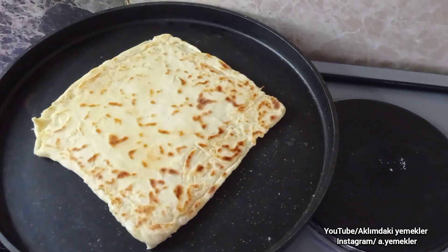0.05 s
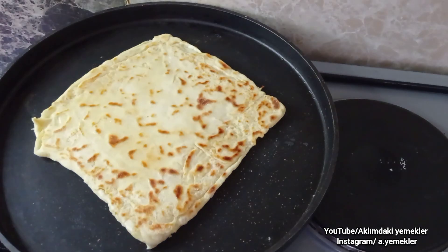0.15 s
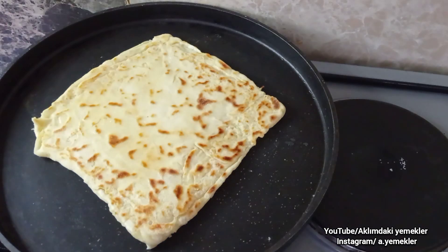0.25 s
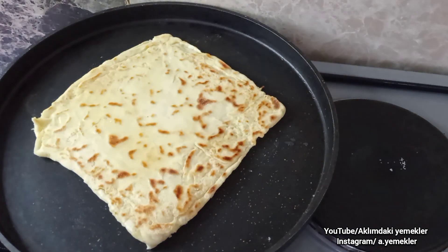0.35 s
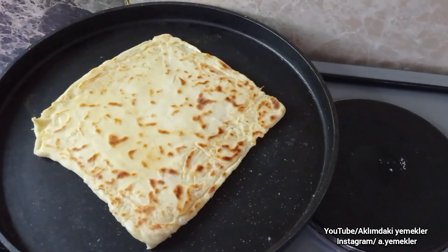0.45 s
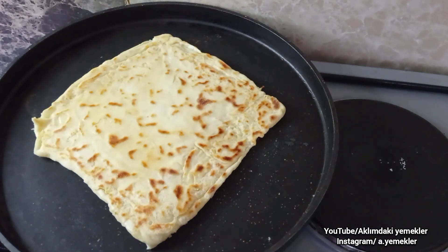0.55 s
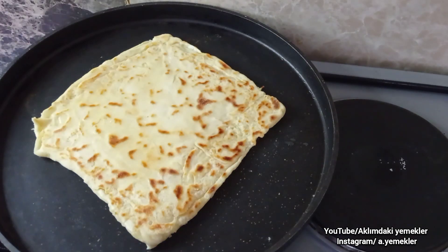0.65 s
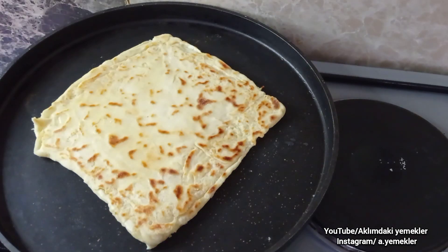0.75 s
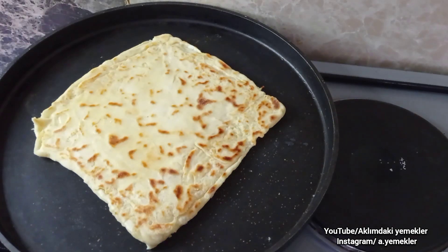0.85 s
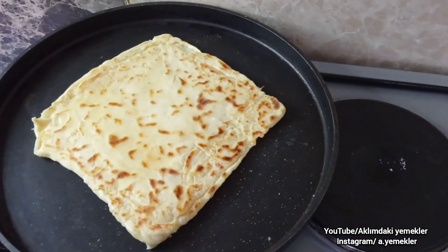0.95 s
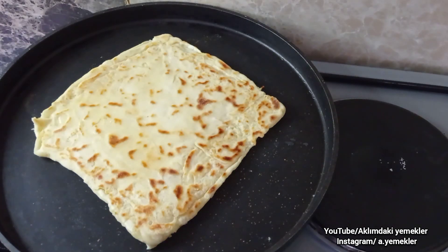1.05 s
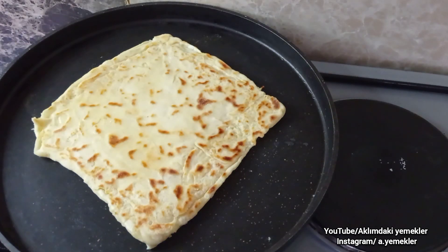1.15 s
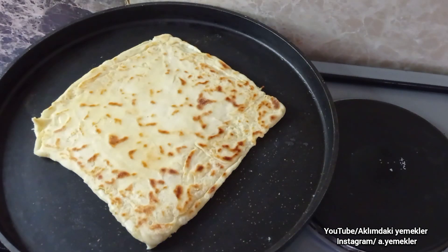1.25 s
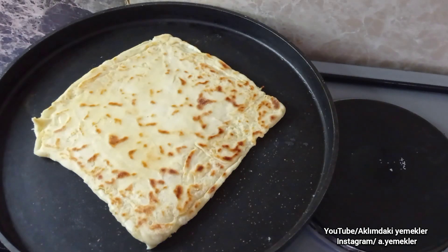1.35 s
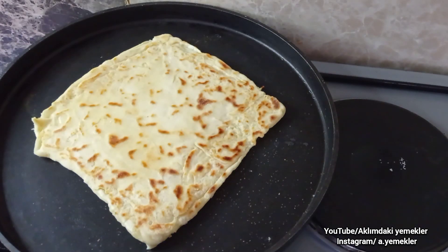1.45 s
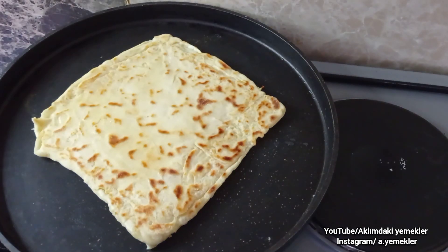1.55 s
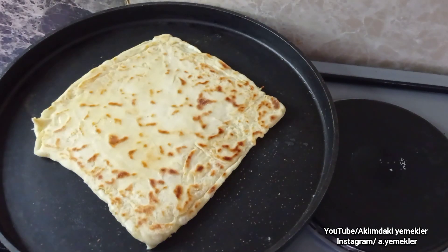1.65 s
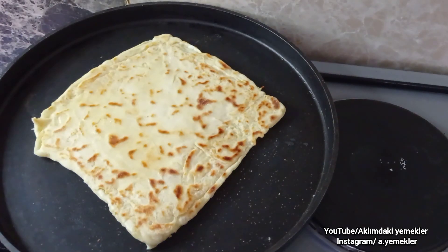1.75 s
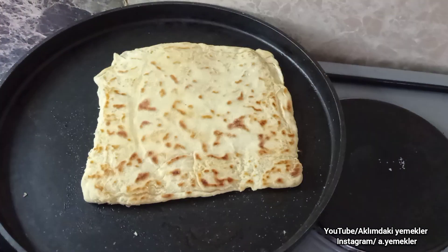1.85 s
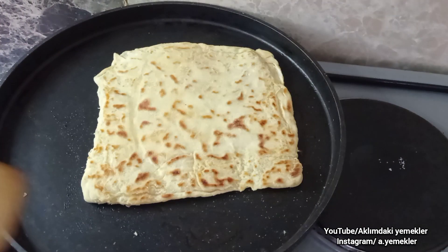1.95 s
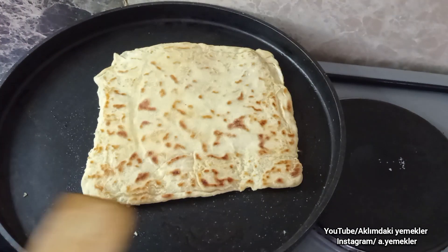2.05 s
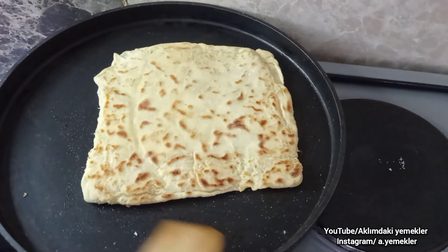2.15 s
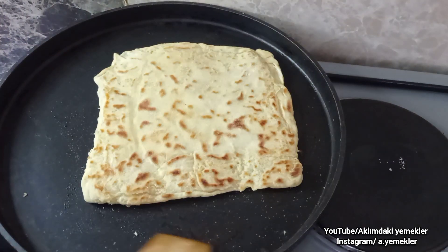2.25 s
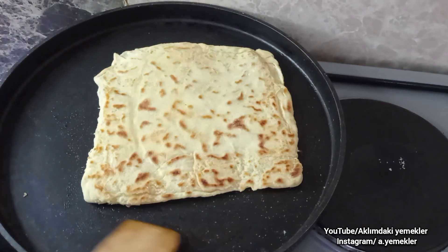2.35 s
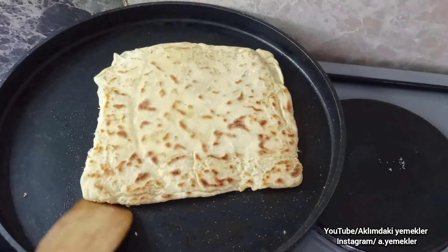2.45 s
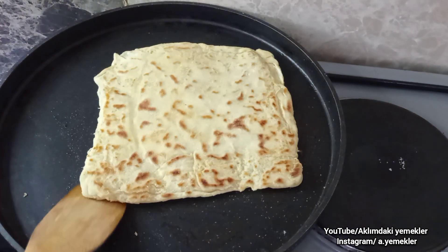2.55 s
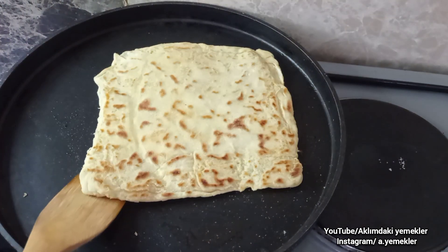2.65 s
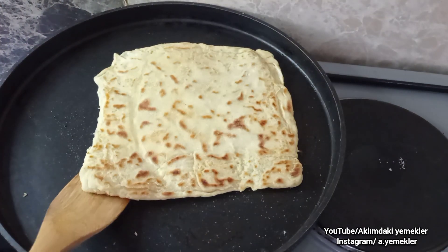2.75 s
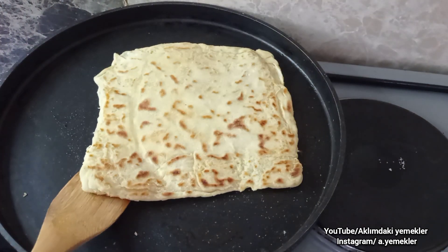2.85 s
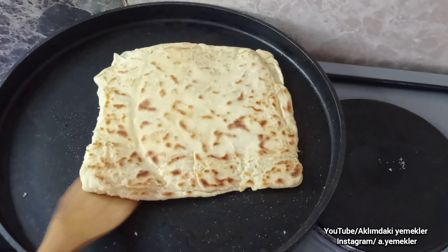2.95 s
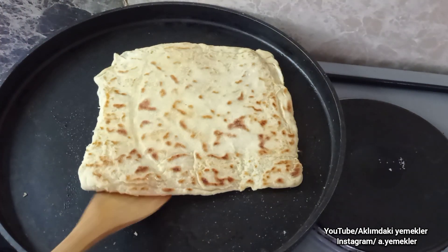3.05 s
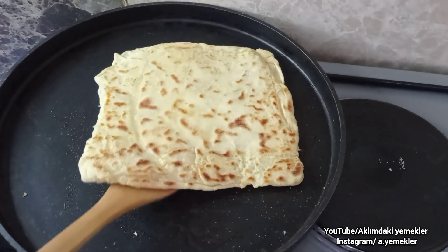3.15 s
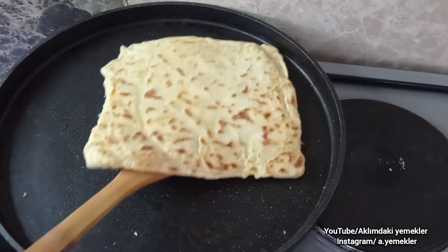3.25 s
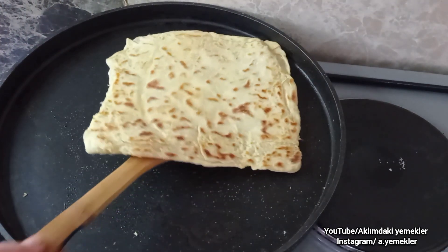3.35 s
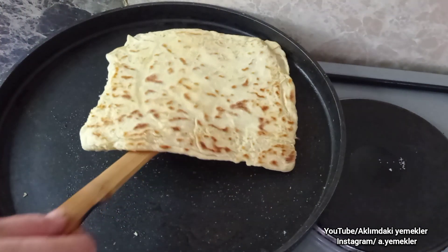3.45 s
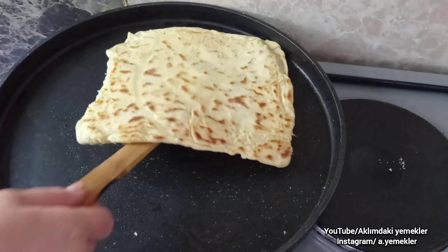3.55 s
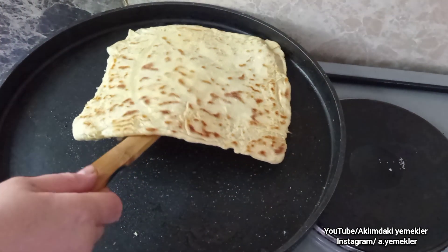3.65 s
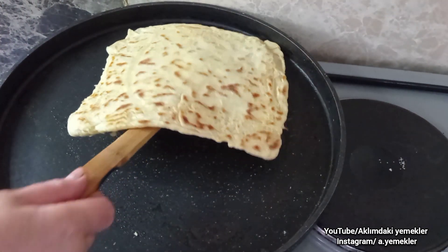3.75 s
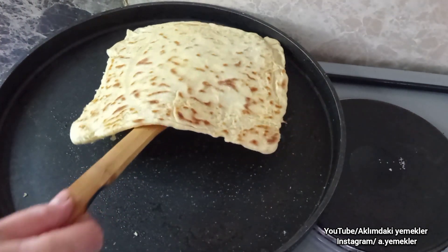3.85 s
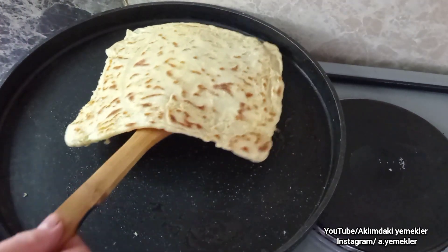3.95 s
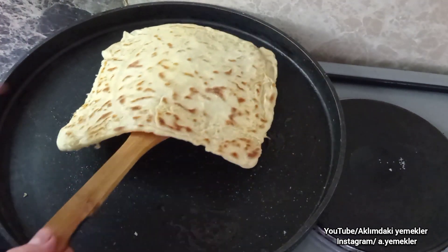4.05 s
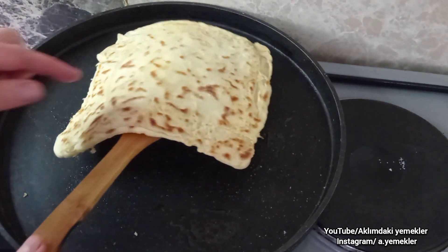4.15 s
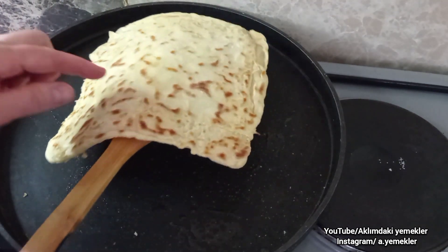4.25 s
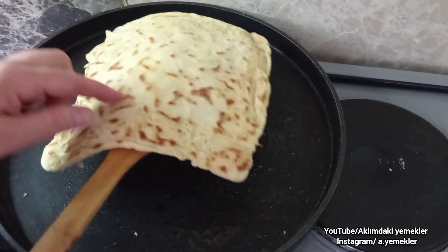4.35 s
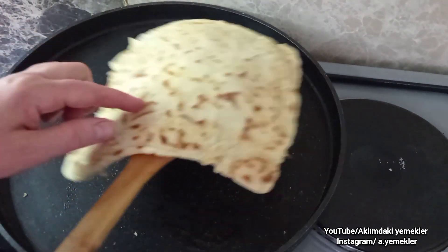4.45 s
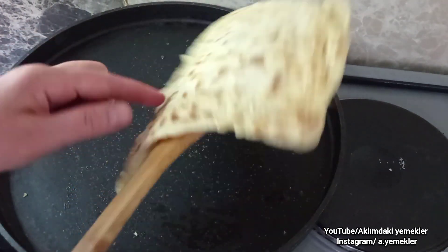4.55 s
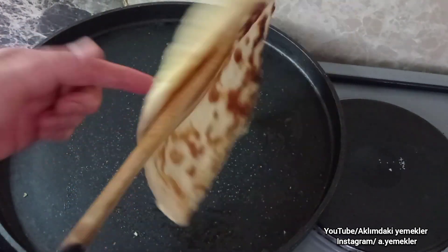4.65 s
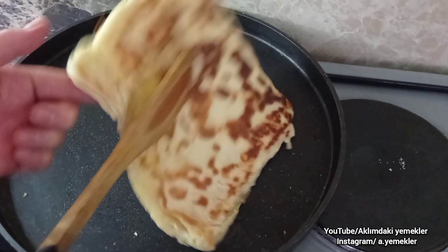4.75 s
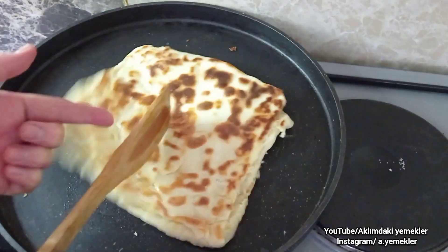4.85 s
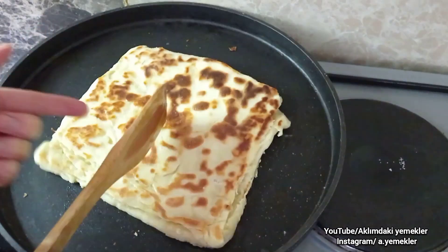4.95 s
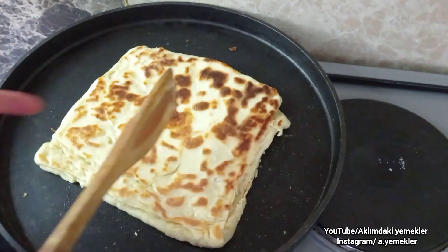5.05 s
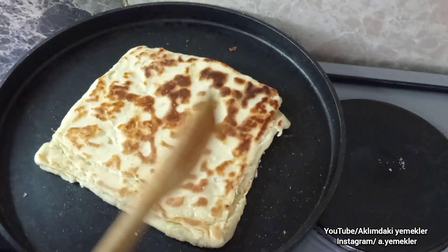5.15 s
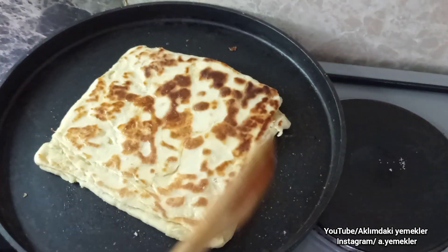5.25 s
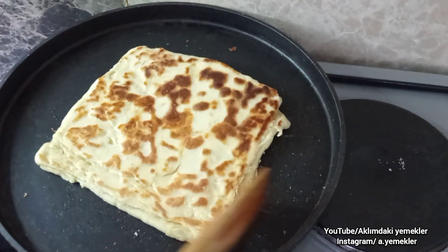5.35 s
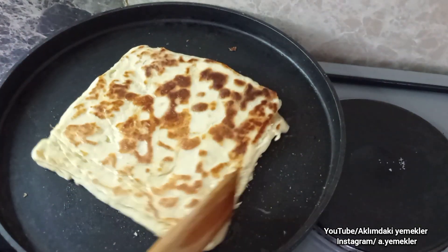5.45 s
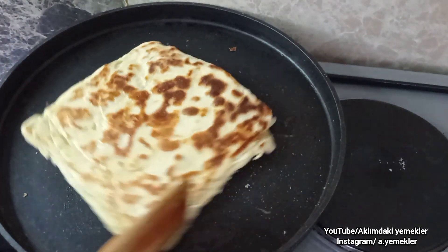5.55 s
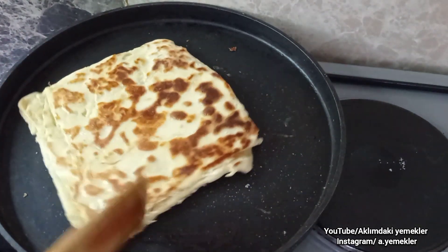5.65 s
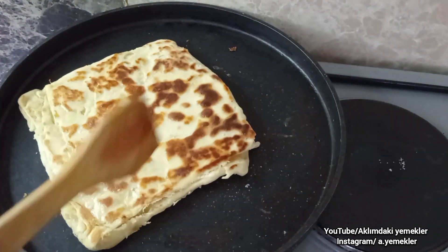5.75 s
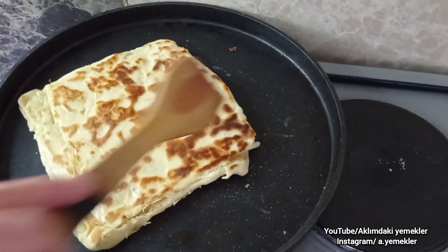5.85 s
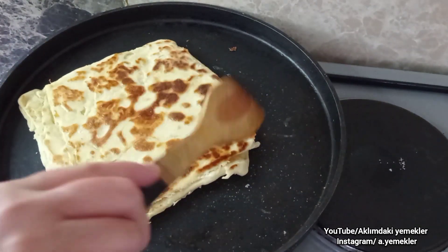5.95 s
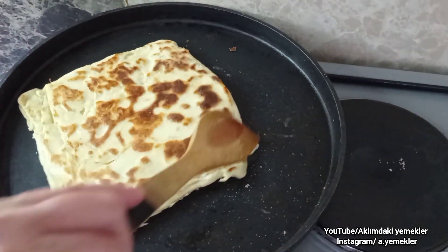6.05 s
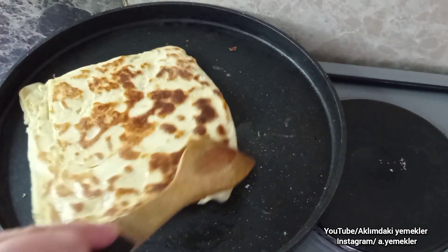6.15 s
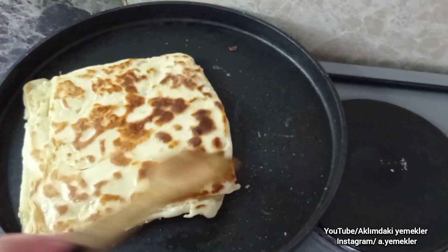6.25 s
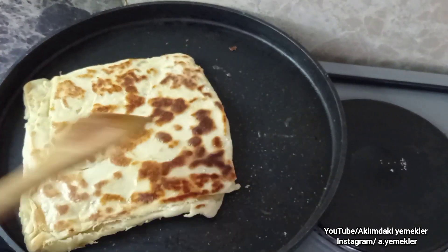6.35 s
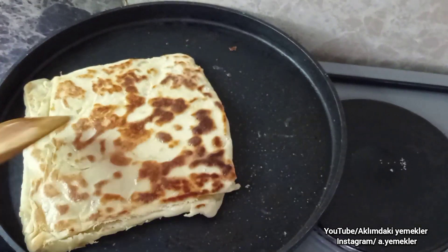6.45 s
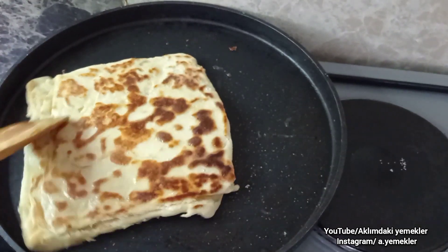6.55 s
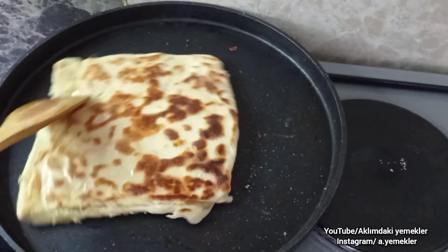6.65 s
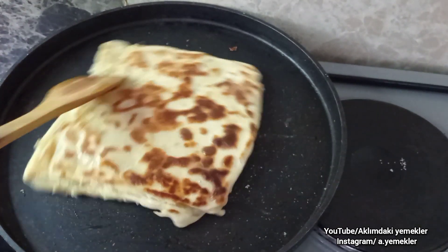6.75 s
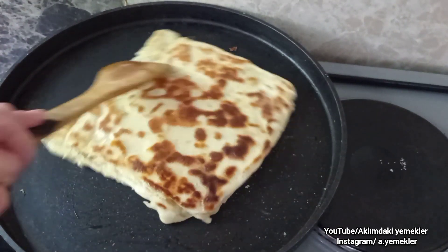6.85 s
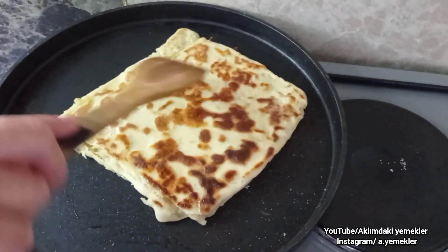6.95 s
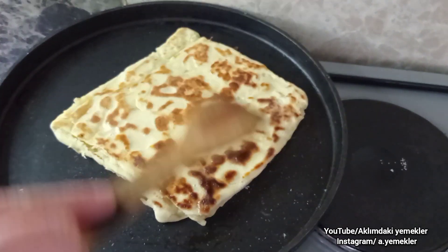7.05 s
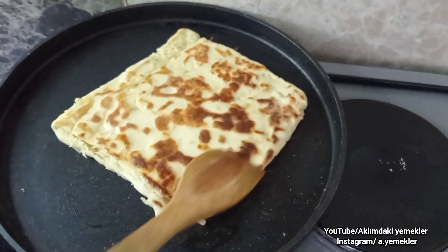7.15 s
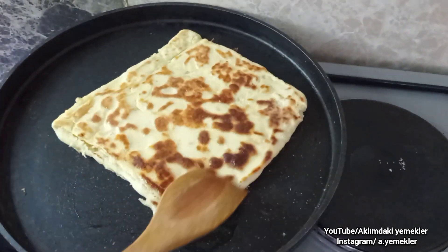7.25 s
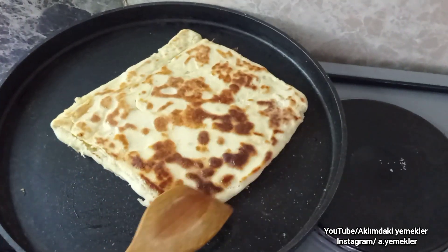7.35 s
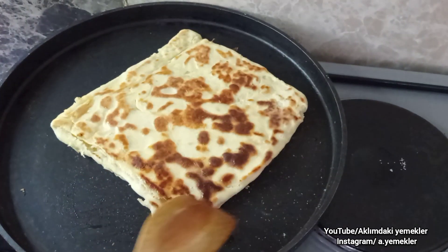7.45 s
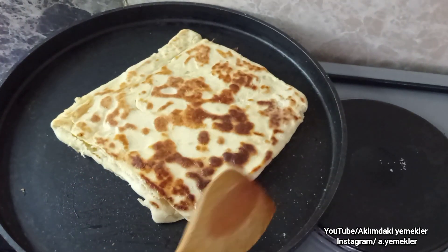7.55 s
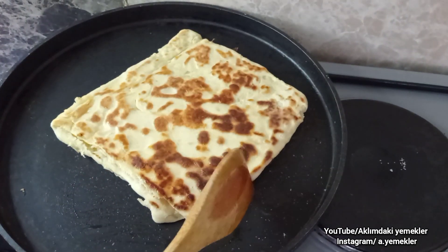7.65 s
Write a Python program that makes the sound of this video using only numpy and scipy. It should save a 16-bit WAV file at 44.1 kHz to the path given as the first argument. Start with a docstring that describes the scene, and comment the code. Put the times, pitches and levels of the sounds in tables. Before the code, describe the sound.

Heard close up in a small kitchen, a flatbread fries with a quiet hiss while an appliance hums faintly. After a momentary dropout, a wooden spatula knocks and rasps across the non-stick pan, and the oil briefly spits louder. Thin ticks lead to the flip, with soft thuds and the loudest clack. The bread then swishes over the pan among lightly ringing knocks, ending with short, squeaky scrapes.

```python
"""A wooden spatula turns a flatbread in a non-stick pan, heard close up in a small kitchen.
The blade knocks, and it scrapes, chatters and ticks by stick-slip; knocks and friction ring the pan.
The bread flops over with a snap of crust and dull thuds, and swishes as it is pushed around.
Oil bubbles burst in a steady sizzle that flares as the bread is lifted. An appliance hums faintly.
All sound drops out briefly near 1.7 s."""
import sys
import numpy as np
from scipy import signal
from scipy.fft import rfft, irfft
from scipy.io import wavfile
from scipy.ndimage import uniform_filter1d

SR = 44100
rng = np.random.default_rng(int(sys.argv[2]) if len(sys.argv) > 2 else 0)


def file_out(sig):
    """Save sig as 16-bit WAV at sys.argv[1]."""
    # one column per channel
    cols = np.atleast_2d(sig).T
    # limit, then scale
    lim = np.clip(cols, -1, 1)
    pcm = np.round(lim * 32767).astype(np.int16)
    wavfile.write(sys.argv[1], SR, pcm)


N = 340011
TIME_S = np.arange(N) / SR
FREQ_HZ = np.fft.rfftfreq(N, 1 / SR) + 1e-3

# Knocks and clicks in the pan: spatula blows and one snap of crust (4.707 s).
# t/s, level/dB, f_low/Hz, f_high/Hz, contact t60/s, ring re crack/dB
PAN_KNOCKS = [(2.087, -61, 3050, 7000, 0.056, -9), (2.287, -49, 350, 6000, 0.32, 3),
              (2.296, -50.5, 350, 1000, 0.031, -1), (4.707, -45, 4800, 9000, 0.014, -5),
              (4.811, -43.5, 200, 4000, 0.11, -24), (4.829, -38.5, 251, 1930, 0.29, -31),
              (4.844, -35.5, 2000, 9050, .06, -27), (4.885, -45, 500, 4000, 0.17, -20),
              (4.8993, -23, 3800, 7300, .06, -7), (4.901, -23.5, 880, 2330, 0.028, -2),
              (5.3586, -28.5, 402, 2620, 0.13, 4.5), (6.005, -41, 1490, 8700, 0.011, -5.5),
              (6.016, -32.5, 334, 2400, .038, -5), (6.535, -45.5, 250, 6600, 0.42, 0.5),
              (6.584, -39, 200, 3000, 0.13, -9), (7.130, -42, 700, 7540, 0.05, -19),
              (7.133, -33, 334, 1270, 0.024, -13.5), (7.154, -52, 402, 1500, 0.025, -16),
              (7.299, -47, 590, 8100, 0.057, -13), (7.681, -47.5, 680, 6740, .04, -3.5)]
# Blade slides: t/s, length/s, level/dB, drift/dB, body re rub/dB
BLADE_STROKES = [(2.292, 0.5, -64.5, -1.5, -7), (2.964, .12, -46, -0.5, -9), (3.11, .22, -53, 4, -6),
                 (3.347, .29, -51.5, -1.5, -8), (3.7, 0.22, -61.5, 3.5, -7), (3.946, 0.46, -65, -10.5, -7),
                 (7.13, 0.11, -51, -3, -3), (7.271, .11, -59.5, 1, -4)]
# Pressed edge: t/s, length/s, rasp level/dB, drift/dB, squeak re rasp/dB, squeak f/Hz
EDGE_CHATTER = [(2.37, .098, -56.5, 11.5, -1.5, 2193), (2.483, 0.42, -58, -3.5, -27, 2270),
                (7.144, 0.081, -54.5, 9.5, -2.5, 6300), (7.255, 0.048, -56.5, 12, -6, 6400),
                (7.328, 0.048, -54.5, 4, -10, 6340)]
# Lone edge slips: t/s, relative level/dB
EDGE_SLIPS = [(4.152, -43), (4.249, -43), (4.464, -47), (4.692, -42), (5.292, -52), (6.385, -45.5)]
# Pan modes: f/Hz, relative level/dB, t60/s
PAN_MODES = [(170, -17, 0.34), (385, -6.5, 0.25), (630, -10.5, 0.23), (892, -15.5, 0.09),
             (1079, -6.5, 0.15), (1240, -5, 0.1), (1400, -3.5, 0.097), (1490, 1.5, 0.16),
             (1580, -6.5, 0.21), (1837, -11.5, 0.24), (1980, -8.5, 0.23), (2139, -3, 0.23),
             (2170, -11, 0.39), (2740, -3.5, 0.11), (2850, -16, 0.11), (3160, -19, 0.15), (3410, -2, 0.15),
             (4130, 0.5, 0.082), (4258, -23, 0.13), (5230, -5, 0.24), (5250, -1, 0.13), (5800, -14, .16),
             (6000, -2, 0.077), (6120, 6.5, 0.076), (6620, 5, .1)]
# Bread pushed over the pan: t/s, length/s, relative level/dB
BREAD_PUSHES = [(5.445, 0.26, -40), (6.02, 0.25, -44), (6.528, .44, -42)]
# Bread lands or is pressed: t/s, relative level/dB, f/Hz, t60/s
BREAD_THUDS = [(2.8, -60.5, 264, 0.27), (4.817, -40.5, 204, 0.28), (4.902, -43, 142.4, 0.65),
               (4.903, -44, 380, 0.3), (4.986, -49.5, 241, 0.24), (5.362, -39.5, 420, 0.2),
               (6.018, -39.5, 460, 0.15), (6.586, -44.5, 128, 0.17), (7.134, -52, 110, 0.21),
               (7.134, -56, 374, 0.22)]
# Large oil bubbles: t/s, relative level/dB
OIL_POPS = [(1.6236, -53), (3.2442, -41), (3.313, -35), (3.3296, -31), (3.7952, -38), (3.822, -39.5),
            (3.9367, -40), (4.5103, -48), (4.663, -47), (5.526, -34.5)]
# Oil envelopes, steady and flaring: t/s, relative level/dB
FRYING_ENVELOPE = [(0, -63.5), (1.66, -64.5), (1.9, -70), (2.3, -63), (5.5, -62), (6.6, -66), (7.7, -68)]
FLARE_ENVELOPE = [(2.9, -71), (3.05, -59), (3.22, -63.5), (3.34, -53.5), (3.5, -56), (3.6, -48),
                  (3.69, -47.5), (3.8, -58.5), (4.1, -66), (4.62, -77)]
# Appliance air resonances and mains lines: f/Hz, width/Hz, level/dB
HUM_LINES = [(1338, 5.3, -80.5), (1403, 39, -75.5), (128.4, 22, -81.5), (58.8, 3.2, -89)]
# Brief chance rises in the level of the fluttering hum: t/s, length/s, level/dB
HUM_RISES = [(0, 0.02, -68), (0.118, 0.046, -68), (0.817, 0.048, -64.5), (0.948, 0.021, -68),
             (1.203, 0.045, -65)]
# Source spectra: f/Hz, gain/dB
BLADE_SPECTRUM = [(40, -19), (130, -9), (280, -12), (400, -1.5), (580, 0), (750, -7.5), (1020, 1.5),
                  (1500, -5.5), (2200, -7.5), (3500, -12), (6500, -9), (9000, -28), (16000, -48)]
RASP_SPECTRUM = [(800, -19), (2400, -3), (3500, -3), (5000, -3.5), (6300, 2.5), (7400, -3), (9000, -8.5),
                 (13000, -22.5), (16000, -32)]
CRUST_SPECTRUM = [(40, -35.5), (130, -5.5), (260, -18), (400, -5), (620, 4), (800, 1), (1500, 3), (2700, 2),
                  (4500, -2.5), (6500, -3.5), (7500, -5), (8300, -13.5), (12500, -23), (16000, -38)]
FRYING_SPECTRUM = [(300, -29), (1000, -7.5), (3000, -11.5), (4200, -2.5), (5300, 1.5), (6400, 3.5),
                   (7300, -0.5), (8200, -7.5), (10000, -9), (13000, -21), (16000, -22.5)]
FLARE_SPECTRUM = [(500, -21.5), (1800, -9.5), (3000, -7.5), (4800, -4), (6300, 2), (7300, -2.5), (8200, -6),
                  (10000, -8.5), (13000, -15.5), (16000, -20.5)]
MURMUR_SPECTRUM = [(25, -23), (45, -20), (65, 0.5), (130, 8), (200, -3.5), (300, -7), (420, 0.5),
                   (520, -7.5), (850, -26), (2000, -45), (6000, -70)]


def pan_knocks(push_db=-4, tail_db=-17, tail_t60_s=0.16, edge_hz=7400, air_db=-20):
    """Spatula blows and one crust snap: push, crack, woody tail, pan ring. Softer contact loses treble."""
    out = np.zeros(N)
    for t_s, db, low_hz, high_hz, t60_s, ring_db in PAN_KNOCKS:
        push = unit_attack(band(decay(0.001), low_hz, high_hz, order=3))
        crack = unit_attack(band(burst(t60_s), low_hz, high_hz, order=3))
        tail = unit_attack(band(burst(tail_t60_s), low_hz, high_hz, order=3))
        ring = unit_attack(band(pan_ring(), low_hz / 2, high_hz * 1.22, order=4))
        knock = undb(push_db) * push + crack + undb(tail_db) * tail + undb(ring_db) * ring
        knock = unit_attack(band(knock, 59, edge_hz, order=6))
        hardness = min(high_hz / edge_hz, 1) ** 3
        air = hardness * unit_attack(band(burst(t60_s * 1.5), 7000, 12000, order=1))
        add(out, t_s, undb(db) * (knock + undb(air_db) * air))
    return out


def blade_scrapes(split_hz=780):
    """Wood catches and slips unevenly on the coating; bearing down brings out the low body."""
    catches = grains(rate_hz=4000, spread_db=0.5) * undb(1.24 * wander(45))
    friction = colour(through_pan(catches, ring_db=-14.5), BLADE_SPECTRUM)
    lows = irfft(rfft(friction) / (1 + (FREQ_HZ / split_hz) ** 8), N)
    rub = unit_in_band(friction - lows, 570, 3350)
    body = unit_in_band(lows, 250, 920)
    out = np.zeros(N)
    for t_s, length_s, db, drift_db, body_db in BLADE_STROKES:
        gain = gesture(t_s, length_s, db, drift_db, attack_s=0.041, release_s=0.032)
        out += (rub + undb(body_db) * body) * gain
    return out


def edge_chatter(squeak_width_hz=300):
    """Held steeply, the edge sticks and slips: a narrow squeak inside a dry rasp."""
    catches = grains(rate_hz=3900, spread_db=1.5)
    rasp = unit(colour(through_pan(catches, ring_db=-14), RASP_SPECTRUM))
    out = np.zeros(N)
    for t_s, length_s, db, drift_db, squeak_db, hz in EDGE_CHATTER:
        squeak = unit(wander(2 * squeak_width_hz) * np.sin(2 * np.pi * hz * TIME_S))
        gain = gesture(t_s, length_s, db, drift_db, attack_s=0.0091, release_s=0.011)
        out += (rasp + undb(squeak_db) * squeak) * gain
    return out


def edge_slips(edge_hz=6650, width_hz=1400, t60_s=0.022, smear_db=-5, wood_db=-14, gain_db=-11):
    """Slips snap the thin edge, which rings at one high pitch: singly and in one weakening run."""
    run_start_s, period_s, run_db, fall_db_per_s = 4.2765, 0.0216, -43, 9
    run = [(run_start_s + lag_s, run_db - fall_db_per_s * lag_s) for lag_s in period_s * np.arange(6)]
    out = np.zeros(N)
    for t_s, db in EDGE_SLIPS + run:
        smear = burst(t60_s) / np.sqrt(t60_s * SR / 8)
        snap = decay(0.00016) + undb(smear_db) * smear
        edge = unit_attack(resonate_twice(snap, edge_hz, width_hz))
        wood = unit_attack(band(snap, 1020, 1770))
        add(out, t_s, undb(db + gain_db) * (edge + undb(wood_db) * wood))
    return out


def pan_ring():
    """Pan modes after one tap; each spot on the pan has its own phases."""
    return sum(undb(db) * decay(t60_s) * np.sin(2 * np.pi * (hz * TIME_S[:SR // 2] + rng.random()))
               for hz, db, t60_s in PAN_MODES)


def through_pan(friction, ring_db):
    """Friction heard directly and through the pan's modes."""
    ring = signal.fftconvolve(friction, pan_ring())[:N]
    return unit(friction) + undb(ring_db) * unit(ring)


def bread_swish(flip_s=4.705, lay_down_s=0.11, push_gain_db=-2.03):
    """Dry crust rubs at many points and rings the pan; in the flip the rim lands first, sounding thin."""
    crust = grains(rate_hz=14000, spread_db=2.2) * undb(0.62 * wander(60))
    swish = colour(through_pan(crust, ring_db=-9), CRUST_SPECTRUM)
    swish = unit_in_band(swish, 760, 4330)
    rim = unit(band(crust, 3400, 8100))
    contact = np.clip((TIME_S - flip_s) / lay_down_s, 0, 1)
    flip = contact * swish + (1 - contact) * rim
    flip_gain = gesture(flip_s, length_s=0.19, db=-47.5, drift_db=2, attack_s=0.012, release_s=0.055)
    pushes = sum(push_gain(*push) for push in BREAD_PUSHES)
    return undb(push_gain_db) * swish * pushes + flip * flip_gain


def push_gain(start_s, length_s, db, speed_power=0.9, release_s=0.016):
    """Push speed is one smooth arch; loudness follows with a short lag."""
    progress = np.clip((TIME_S - start_s) / length_s, 0, 1)
    speed = np.maximum(np.sin(np.pi * progress), 0)
    pole = np.exp(-1 / (release_s * SR))
    return undb(db) * signal.lfilter([1 - pole], [1, -pole], speed ** speed_power + 1e-18)


def bread_thuds(band_ratio=1.374, rumble_db=-14):
    """Dough loads the pan slowly, so only the bass sounds."""
    out = np.zeros(N)
    for t_s, db, hz, t60_s in BREAD_THUDS:
        body = unit(band(rng.standard_normal(SR // 2), hz / band_ratio, hz * band_ratio, order=3))
        rumble = unit(band(rng.standard_normal(SR // 2), 45, 170))
        envelope = decay(t60_s) - decay(0.032)
        add(out, t_s, undb(db) * (body + undb(rumble_db) * rumble) * envelope)
    return out


def oil_pops(tick_hz=6700, width_hz=1600, snap_db=-12, t60_s=0.026, gain_db=-11):
    """Large bubbles burst singly with a bright tick."""
    out = np.zeros(N)
    for t_s, db in OIL_POPS:
        crack = burst(t60_s)
        tick = resonate(crack, tick_hz, width_hz) + undb(snap_db) * band(crack, 2300, 10400)
        add(out, t_s, undb(db + gain_db) * unit_attack(tick))
    return out


def oil_sizzle(flare_gain_db=-1):
    """Tiny bubbles burst in a fine hiss, coarser and brighter where fresh oil meets the hot pan."""
    steady = unit(colour(grains(rate_hz=12000, spread_db=2), FRYING_SPECTRUM))
    steady *= undb(0.21 * wander(10)) * curve(FRYING_ENVELOPE)
    flare = colour(grains(rate_hz=5500, spread_db=1.5), FLARE_SPECTRUM)
    flare = unit_in_band(flare, 7730, 12200)
    flare *= undb(wander(70)) * curve(FLARE_ENVELOPE)
    return steady + undb(flare_gain_db) * flare


def appliance_hum(tone_hz=626, tone_db=-73, waver_db=2, murmur_db=-77.5):
    """A fluttering tone, air resonances and mains lines over the kitchen's low murmur."""
    murmur_gain = undb(murmur_db + 2.5 * wander(6.8))
    murmur = unit(colour(rng.standard_normal(N), MURMUR_SPECTRUM))
    tone = resonate(rng.standard_normal(N), tone_hz, width_hz=50)
    tone = unit(resonate(tone, tone_hz, width_hz=95))
    rises = sum(gesture(*rise, drift_db=0, attack_s=0.01, release_s=0.013) for rise in HUM_RISES)
    tone_gain = np.hypot(undb(tone_db + waver_db * wander(14)), rises)
    out = murmur_gain * murmur + tone_gain * tone
    for hz, width_hz, db in HUM_LINES:
        out += undb(db + waver_db * wander(10)) * unit(resonate(rng.standard_normal(N), hz, width_hz))
    return out


def kitchen_reverb(x, t60_s=0.35, wet_db=-16):
    """Close walls and worktop return a short, dull tail."""
    tail = band(burst(t60_s) * (1 - decay(0.022)), 130, 4000, order=1)
    return x + undb(wet_db) * signal.fftconvolve(x, tail / np.linalg.norm(tail))[:N]


def gesture(start_s, length_s, db, drift_db, attack_s, release_s):
    """Gain: linear attack, drifting hold, exponential release."""
    age_s = TIME_S - start_s
    attack = np.clip(age_s / attack_s, 0, 1)
    hold = undb(db + drift_db * np.clip(age_s / length_s, 0, 1))
    release = np.exp(-np.maximum(age_s - length_s, 0) / release_s)
    return attack * hold * release


def curve(points, edge_s=0.041):
    """Gain along (t/s, level/dB) points, fading to zero outside them."""
    t_s, db = np.transpose(points)
    outside_s = np.maximum(np.maximum(t_s[0] - TIME_S, TIME_S - t_s[-1]), 0)
    return undb(np.interp(TIME_S, t_s, db)) * np.maximum(1 - outside_s / edge_s, 0)


def grains(rate_hz, spread_db):
    """Random clicks, a few larger than the rest; rms 1."""
    size = undb(spread_db * np.minimum(rng.exponential(size=N), 6))
    hits = rng.random(N) < rate_hz / SR
    return unit(hits * size * rng.choice([-1, 1], N))


def wander(rate_hz):
    """Smooth random signal, spread 1."""
    hold = int(SR / rate_hz)
    steps = np.repeat(rng.standard_normal(N // hold + 1), hold)
    return unit(uniform_filter1d(steps, hold)[:N])


def decay(t60_s):
    """Exponential decay, 0.5 s long."""
    return np.exp(-np.log(1000) * TIME_S[:SR // 2] / t60_s)


def burst(t60_s):
    """Decaying noise: modes too dense to resolve."""
    return rng.standard_normal(SR // 2) * decay(t60_s)


def colour(x, spectrum):
    """Filter by (f/Hz, gain/dB) points."""
    hz, db = np.transpose(spectrum)
    gain = undb(np.interp(np.log(FREQ_HZ), np.log(hz), db))
    return irfft(rfft(x) * gain, N)


def band(x, low_hz, high_hz, order=2):
    """Causal band-pass."""
    high_hz = min(high_hz, 0.45 * SR)
    low_hz = min(low_hz, 0.9 * high_hz)
    return signal.sosfilt(signal.butter(order, [low_hz, high_hz], "band", fs=SR, output="sos"), x)


def resonate(x, hz, width_hz):
    """One resonance."""
    return signal.lfilter(*signal.iirpeak(hz, hz / width_hz, fs=SR), x)


def resonate_twice(x, hz, width_hz):
    """Two resonances in series, each width_hz wide."""
    return resonate(resonate(x, hz, width_hz), hz, width_hz)


def undb(db):
    """dB to gain."""
    return 10 ** (np.asarray(db) / 20)


def unit(x):
    """Scale to rms 1."""
    return x / np.std(x)


def unit_in_band(x, low_hz, high_hz):
    """Scale to rms 1 within one band."""
    return x / np.std(band(x, low_hz, high_hz, order=6))


def unit_attack(x):
    """Scale to rms 1 over the first 10 ms."""
    return x / np.sqrt(np.mean(x[:SR // 100] ** 2))


def add(out, t_s, x):
    """Mix x in at t_s."""
    start = int(t_s * SR)
    out[start:start + len(x)] += x[:N - start]


def scene():
    """Mono mix: spatula, bread and pops with reverb; sizzle and hum dry."""
    events = pan_knocks() + bread_thuds() + blade_scrapes() + edge_chatter()
    events += bread_swish() + edge_slips() + oil_pops()
    return (kitchen_reverb(events) + oil_sizzle() + appliance_hum())[None]


def record(dry, peak_hz=15200, width_hz=1800, resonance_db=11, cutoff_hz=15700):
    """Top-treble peak, one brief dropout that fades back in, steep low-pass."""
    peaked = dry + undb(resonance_db) * resonate_twice(dry, peak_hz, width_hz)
    dropout = np.interp(TIME_S, [1.662, 1.664, 1.812, 1.86, 1.94, 2.02], [1, 0, 0, 0.25, 0.8, 1])
    lowpass = signal.ellip(10, 0.2, 70, cutoff_hz, fs=SR, output="sos")
    return signal.sosfilt(lowpass, peaked * dropout)


dry = scene()
out = record(dry)
file_out(out)
```